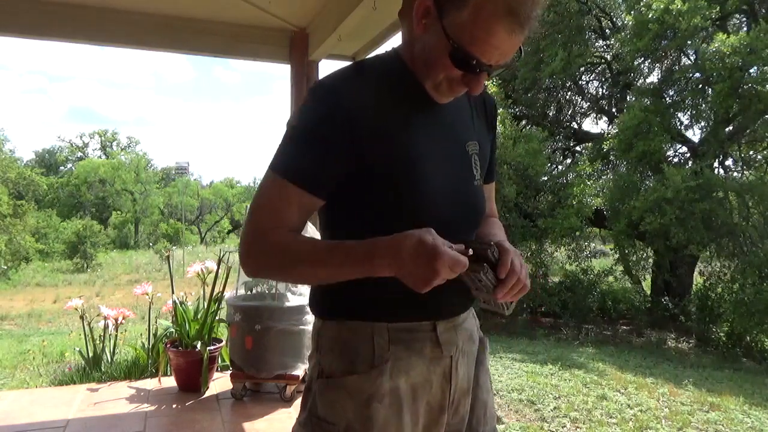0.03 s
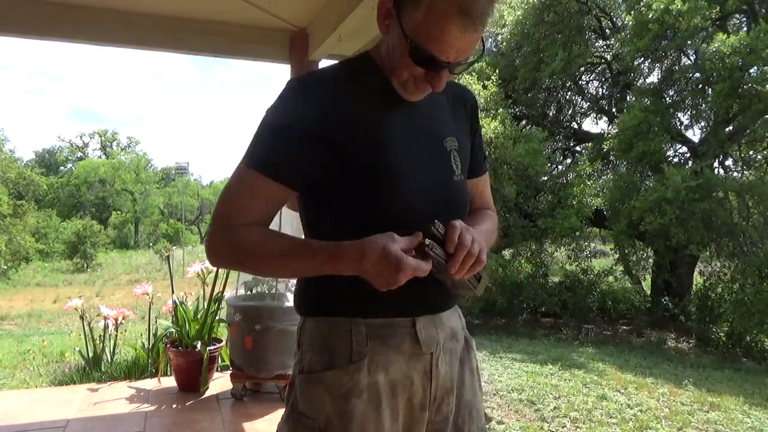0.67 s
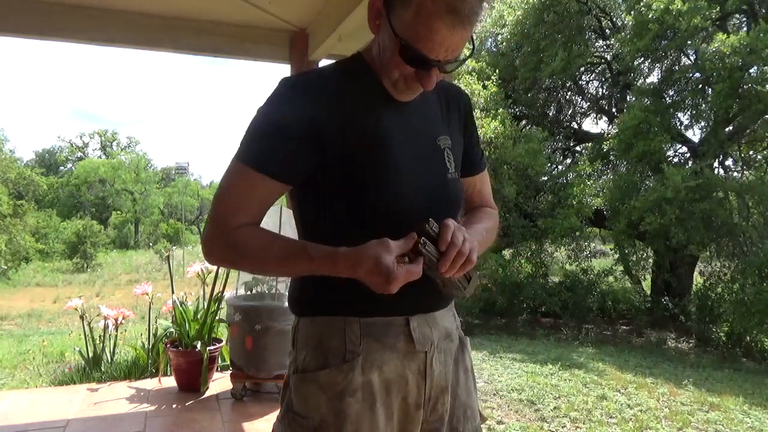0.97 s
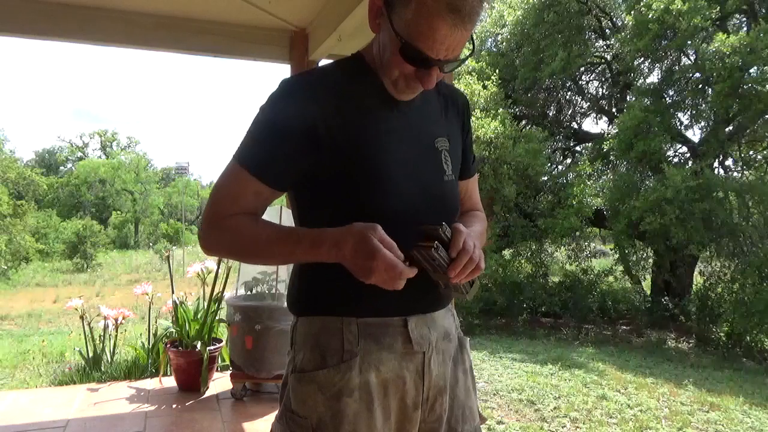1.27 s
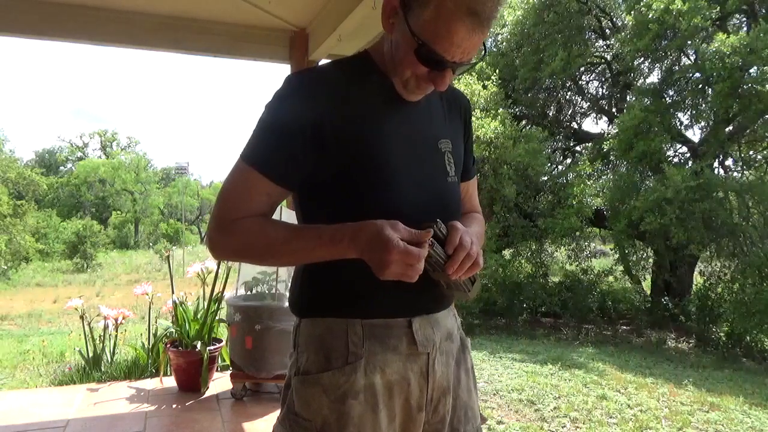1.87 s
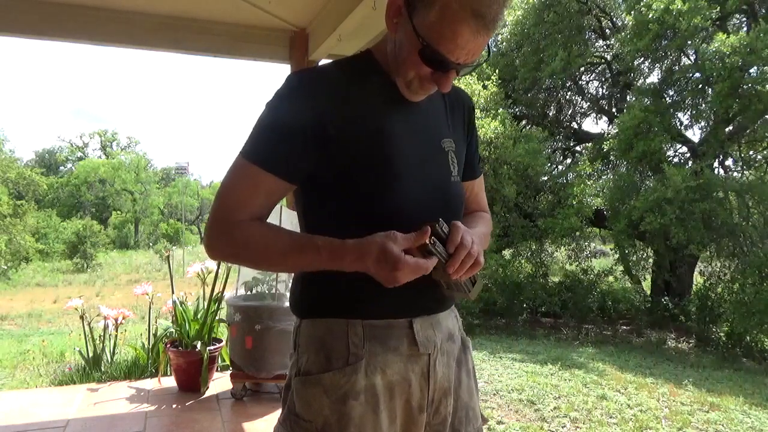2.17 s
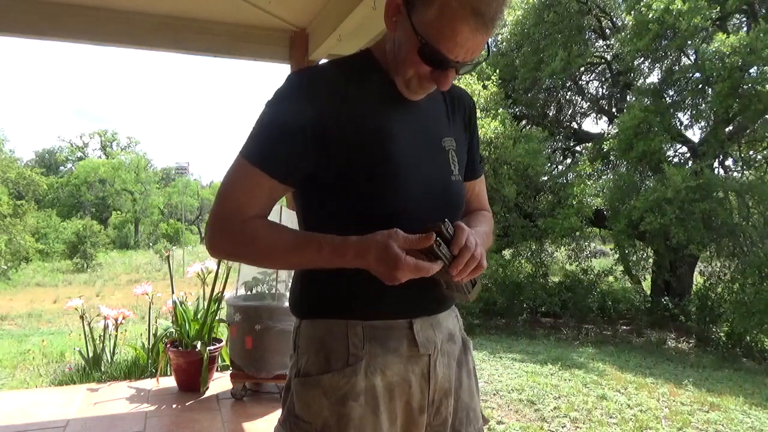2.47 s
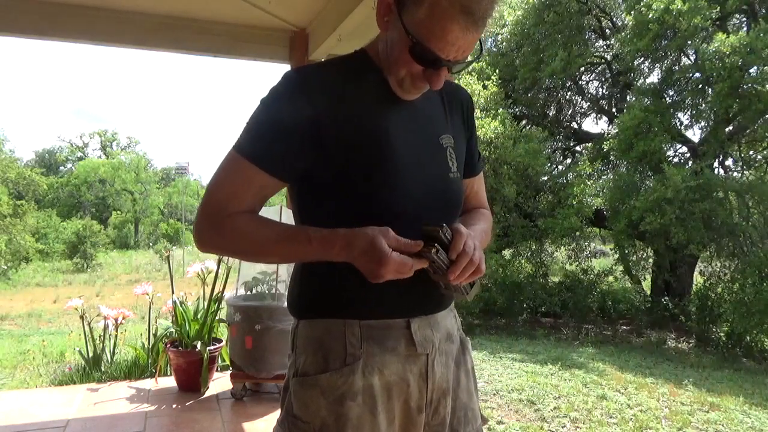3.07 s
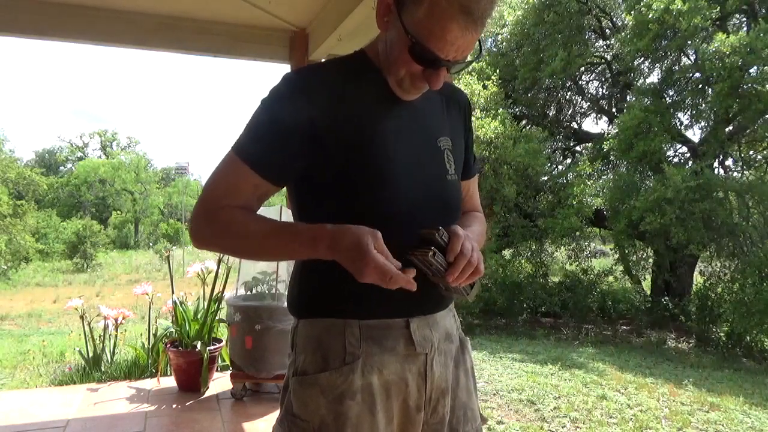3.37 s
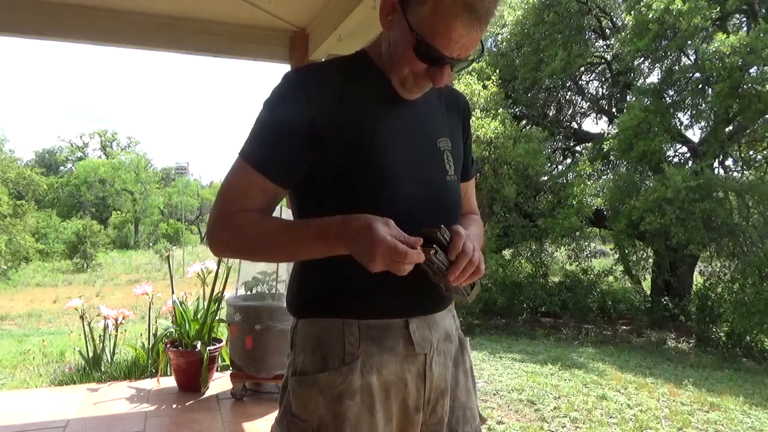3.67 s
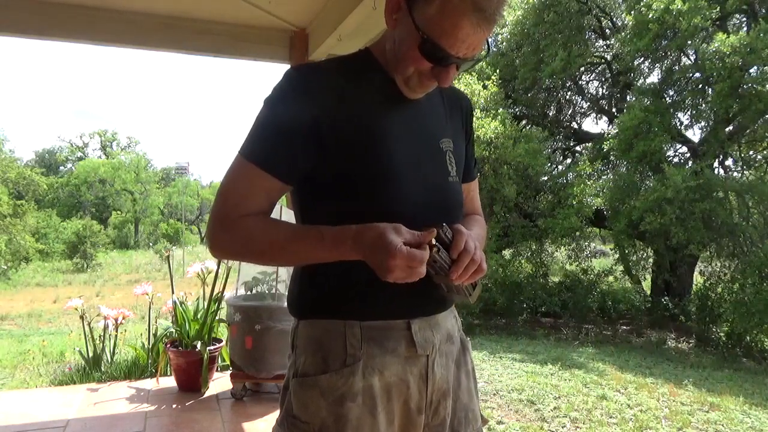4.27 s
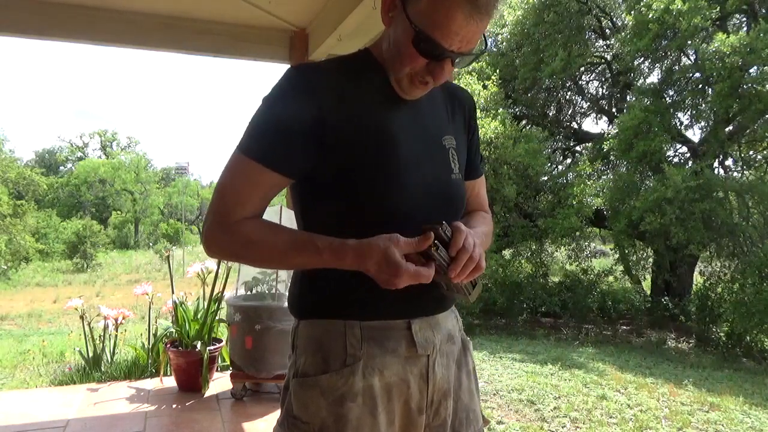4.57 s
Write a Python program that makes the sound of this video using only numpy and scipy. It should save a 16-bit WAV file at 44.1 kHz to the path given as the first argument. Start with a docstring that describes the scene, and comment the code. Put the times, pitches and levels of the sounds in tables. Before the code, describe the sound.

Close to a stereo microphone on a porch, cartridges are pressed one by one into a rifle magazine. Brass ticks and scrapes in uneven clusters, and three times a round snaps home with a brief spring rattle. Loose cases tink in the hand between the clicks. The porch adds short echoes, and distant birds give faint nasal calls over a low rumble and soft hiss.

```python
"""Loading a rifle magazine on a porch

Close to a stereo microphone, just left of centre, cartridges are thumbed one by one into a magazine.
Brass ticks against brass, slides along the feed lips, clicks and snaps home while the spring chatters.
The porch floor and roof throw back short echoes. Far off, birds call from the trees over a faint rumble."""
import sys
import numpy as np
from scipy import signal
from scipy.io import wavfile
from scipy.ndimage import uniform_filter1d, minimum_filter1d

SR = 44100
rng = np.random.default_rng(int(sys.argv[2]) if len(sys.argv) > 2 else 0)


def unload_audio(sound):
    """Save the sound as a 16-bit wav file, at the path given as the first command line argument."""
    columns = np.transpose(np.atleast_2d(sound))
    # keep every value between -1 and 1, then stretch to whole-number steps
    steps = np.round(np.clip(columns, -1, 1) * 32767)
    wavfile.write(sys.argv[1], SR, steps.astype(np.int16))


N = 212738

# Levels in the tables are relative: the functions add their own gains.
# brass strikes the magazine: start_s, level_db, treble_tilt_db, ring_hz
CLICKS = [(0.1877, -27.5, 3.5, 2390), (.2309, -29, -1.5, 2390), (0.4948, -28, 1.5, 4560),
          (.759, -22.5, 1.5, 2270), (0.9066, -33.5, 0, 2760), (0.9928, -42.5, 4, 2480),
          (1.759, -38, 3.5, 4400), (1.882, -34.5, 1.5, 7350), (1.946, -37, 2.5, 4970),
          (1.9538, -24, 2, 2330), (2.2541, -35, -3.5, 2420), (3.108, -29.5, -1.5, 3500),
          (4.2099, -28.5, 4, 6500), (4.3359, -37, -0.5, 2600), (4.3537, -25.5, -4, 4430),
          (4.5582, -28.5, -5.5, 4660), (4.634, -35.5, 7, 3000), (4.655, -34.5, 2, 4100)]
# a round snaps under the lips: start_s, level_db, treble_tilt_db, ring_hz, chatter_decay_s, slip_db
SNAPS = [(.916, -31.5, 1, 10300, 0.027, -30), (2.2893, -25, -2, 4100, .04, -36),
         (4.5708, -26.5, 1.5, 9400, 0.049, -32)]
# the thumb nudges a round against the stack, with a dull tap: start_s, level_db
NUDGES = [(0.732, -51), (0.8922, -38.5), (.9866, -39.5), (1.9197, -39.5), (2.178, -43.5), (2.599, -42.5),
          (2.753, -44.5), (2.919, -45), (2.961, -36), (2.967, -42), (4.075, -48.5)]
# brass slides on the lips: start_s, length_s, level_db
SLIDES = [(0.172, 0.013, -59), (0.752, 0.0053, -40), (0.858, 0.018, -39.5), (1.84, 0.035, -55.5),
          (2.272, 0.026, -40), (2.927, 0.052, -49), (4.051, 0.038, -55), (4.35, .011, -30),
          (4.526, 0.034, -48.5)]
# loose cases touch in the hand: start_s, level_db, pitch_hz
TINKS = [(0.1646, -42, 5300), (1.370, -23.5, 7460), (1.6704, -25.5, 7470), (4.739, -29.5, 4900)]
# how hard the fingers work over the rounds: time_s, level_db
HANDLING = [(0.0, -70), (0.89, -55), (1.14, -60), (1.64, -60), (1.87, -55.5), (2.09, -62.5), (2.42, -55.5),
            (3.11, -64.5), (3.22, -70), (3.87, -67.5), (4.82, -53)]
# fingernails tick on brass: start_s, level_db
NAIL_TICKS = [(0.351, -46.5), (0.426, -51), (0.657, -52.5), (1.356, -48), (1.592, -50.5), (1.733, -49.5),
              (1.805, -46.5), (2.088, -48.5), (4.056, -52.5)]
# the four bands of every contact sound: low_hz, high_hz
BANDS = [(640, 1700), (1700, 3800), (3800, 7000), (7000, 11500)]
# tone of a hard contact: level_db per band
HARD_COLOUR = [-0.096, -0.46, 3.4, -1.95]
# tone of a nudge: level_db per band
NUDGE_COLOUR = [0, -13.5, -3, -12.5]
# tone of a light touch on brass: level_db per band
TICK_COLOUR = [-27, -10.5, -3, -2]
# tone of skin on brass: level_db per band
SKIN_COLOUR = [0.0, 1.5, 2.0, 3.0]
# modes of the magazine body: pitch_hz, width_hz, gain_db
BODY_MODES = [(621.6, 39, -5), (704, 65, -10), (980, 36, -16.5), (1123, 61, -1), (1151, 94, 2.5),
              (1385, 214, -7), (1544, 35, -1), (2315, 82, -7), (2458, 70, 0.5), (2494, 110, -3),
              (3095, 180, -1.5), (4050, 99, -13), (4480, 140, -4.5), (7620, 230, -3), (9040, 510, -2)]
# nasal bird calls from the trees: start_s, length_s, top_pitch_hz, level_db
CALLS = [(0.394, 0.096, 512, -53), (1.419, .12, 622, -54), (1.815, .13, 561, -51.5),
         (2.989, 0.062, 527, -54), (3.053, .14, 556.5, -51), (3.938, 0.091, 499, -52.5),
         (4.09, .11, 535, -51)]
# falling bird whistles: start_s, length_s, level_db
WHISTLES = [(4.498, 0.047, -46), (4.686, 0.15, -52)]
# first reflections off floor and roof: delay_s, gain_db, cutoff_hz
REFLECTIONS = [(.0056, -15.5, 7300), (0.0143, -23, 3500)]
# reverberation of the porch: frequency_hz, tail_t60_s, early_db, tail_db
PORCH_REVERB = [(400, 0.89, -3, -5.5), (1110, 0.39, -6, -12), (2550, 0.34, -7, -11), (4770, 0.41, -12, -18),
                (10080, 0.31, -12, -20)]
# how alike diffuse sound is in the left and right channels: frequency_hz, correlation
STEREO_LIKENESS = [(40, 0.97), (120, 0.93), (300, 0.69), (1000, 0.81), (4000, 0.5), (10000, 0.57)]
# spectral shape of the outdoor air: frequency_hz, density_db
AIR_SPECTRUM = [(15, -37), (25, -6), (75, -2), (272, -14), (309, -14), (342, -11), (557, -18.5), (862, -11),
                (980, -23), (1090, -17.5), (2950, -22.5), (4120, -23), (10100, -33.5), (11500, -45),
                (15000, -75), (22000, -120)]
# rise and fall of the low rumble: time_s, level_db
RUMBLE = [(0.0, -65.5), (0.63, -60.5), (0.94, -55.5), (1.31, -59.5), (2.11, -56), (3.1, -63), (4.05, -56),
          (4.36, -62.5), (4.82, -52.5)]
# soft low bumps in the rumble: start_s, peak_db, pitch_hz
BUMPS = [(.66, -45, 170), (0.827, -40.5, 97), (1.654, -45, 100), (2.164, -47, 80), (4.1, -41, 75),
         (4.475, -43.5, 75.8), (4.62, -35, 92)]


def magazine(click_db=-4.0, nudge_db=-4.0, slide_db=-0.5, chatter_db=-2, body_db=2.5, slip_lead_s=0.0024):
    """Close up: clicks, nudges, snaps and slides all set the magazine body ringing."""
    out, t = np.zeros(N), seconds(.3)
    for s, db, tilt_db, ring_hz in CLICKS:
        add(out, s, knock(hard_contact_levels(db + click_db, tilt_db, ring_hz), ring_hz))
    for s, db in NUDGES:
        levels_db = db + nudge_db + np.array(NUDGE_COLOUR)
        add(out, s, knock(levels_db, ring_hz=2440, decay_s=0.0017, rise_s=0.00066))
    for s, db, tilt_db, ring_hz, chatter_decay_s, slip_db in SNAPS:
        # the rim slips off the lip with a bright crack just before the snap
        add(out, s - slip_lead_s, knock(tilted(slip_db, tilt_db=11), ring_hz=9750))
        levels_db = hard_contact_levels(db, tilt_db, ring_hz)
        add(out, s, knock(levels_db, ring_hz, decay_s=0.0029))
        # the spring and the stack of rounds rattle on
        add(out, s, rub(np.exp(-t / chatter_decay_s), levels_db + chatter_db, per_s=7000, spread_db=1.5))
    for s, length, db in SLIDES:
        pressure = np.sin(np.pi * (seconds(length) / length) ** 1.3) ** .5
        add(out, s, rub(pressure, tilted(db + slide_db, tilt_db=1), per_s=6000, spread_db=3.0))
    body = sum(from_db(db) * resonance(out, hz, width) for hz, width, db in BODY_MODES)
    bass_cut = signal.butter(4, 553, "high", fs=SR, output="sos")   # so small a box radiates no bass
    return signal.sosfilt(bass_cut, out + from_db(body_db) * body)


def knock(levels_db, ring_hz, decay_s=0.002, rise_s=0.00014, ring_db=-2.5, ring_width_hz=260):
    """Crowded metal modes, damped at once by the hand; the low ones are slower, and one stands out."""
    t, attack = seconds(.04), int(.006 * SR)
    modes = 0
    for (low, high), db in zip(BANDS, levels_db):
        slowness = (BANDS[-1][1] / high) ** 0.2
        envelope = (1 - np.exp(-t / (rise_s * slowness))) * np.exp(-t / (decay_s * slowness))
        burst = band(rng.choice([-1, 1], len(t)) * envelope, low, high)
        modes = modes + from_db(db) * burst / np.std(burst[:attack])
    ring_level = from_db(np.interp(ring_hz, np.mean(BANDS, axis=1), levels_db) + ring_db)
    ring_envelope = (1 - np.exp(-t / rise_s)) * np.exp(-np.pi * ring_width_hz * t)
    ring = np.sin(2 * np.pi * ring_hz * t) * ring_envelope
    return modes + ring_level * ring / np.std(ring[:attack])


def hard_contact_levels(db, tilt_db, ring_hz, lift_db=2.5, spread_octaves=0.82):
    """Band levels of a hard contact, which drives the modes around its ring harder too."""
    octaves = np.log2(np.sqrt(np.prod(BANDS, axis=1)) / ring_hz)
    return tilted(db, tilt_db) + HARD_COLOUR + lift_db * np.exp(-(octaves / spread_octaves) ** 2)


def rub(pressure, levels_db, per_s, spread_db):
    """Tiny contacts at random moments, a few harder than the rest, swelling with the pressure."""
    size = len(pressure)
    strengths = from_db(spread_db * np.minimum(rng.exponential(1, size), 4))
    contacts = strengths * rng.choice([-1, 1], size) * (rng.random(size) < per_s / SR)
    friction = sum(from_db(db) * rms_one(band(contacts, *edges)) for edges, db in zip(BANDS, levels_db))
    return pressure * friction


def stack_thuds(gain_db=-17, band_hz=(364, 710), decay_s=0.027):
    """Each snap shoves the whole stack down against the spring with a low thud."""
    out, t = np.zeros(N), seconds(.2)
    for s, db, *_ in SNAPS:
        shudder = rms_one(band(rng.standard_normal(len(t)), *band_hz))
        add(out, s, from_db(db + gain_db) * shudder * np.exp(-t / decay_s))
    return out


def loose_cases(t60_s=0.024, beat_hz=350, twin_db=-5.0, tick_db=-22.0):
    """A case rings with a close pair of modes that beat, soon stopped by the fingers."""
    out, t = np.zeros(N), seconds(.1)
    for s, db, hz in TINKS:
        pair = np.sin(2 * np.pi * hz * t) + from_db(twin_db) * np.sin(2 * np.pi * (hz + beat_hz) * t)
        add(out, s, from_db(db - 60 * t / t60_s) * pair)
        add(out, s, knock(db + tick_db + np.array(TICK_COLOUR), hz))
    return out


def fingers(uneven_db=3.5):
    """Skin rubs softly over brass, and now and then a nail ticks."""
    pressure = from_db(uneven_db * drift(points=130))
    out = from_db(level_curve(HANDLING)) * rms_one(rub(pressure, SKIN_COLOUR, per_s=600, spread_db=2.0))
    for s, db in NAIL_TICKS:
        add(out, s, knock(db + np.array(TICK_COLOUR), ring_hz=rng.uniform(5170, 9200)))
    return out


def bird_calls(arch=0.21, rasp=0.013, throat_start_hz=5060, throat_end_hz=3250, throat_width_hz=1440):
    """Nasal calls from the trees: arching harmonics through a resonance that falls as the throat closes."""
    out, harmonics = np.zeros(N), np.arange(3, 15)[:, None]
    for s, length, top_hz, db in CALLS:
        progress = seconds(length) / length
        bend = (1 - arch * abs(2 * progress - 1) ** 1.8) * (1 + rasp * waver(len(progress), smooth=90))
        throat_hz = throat_start_hz + (throat_end_hz - throat_start_hz) * progress
        throat_hz *= np.sqrt(bend)   # the resonance rises a little with the pitch
        weights = 1 / (1 + ((harmonics * top_hz * bend - throat_hz) / throat_width_hz) ** 2) ** 2
        cycles = harmonics * top_hz * np.cumsum(bend) / SR + rng.random(harmonics.shape)
        call = np.sum(weights * np.sin(2 * np.pi * cycles), axis=0)
        swell = np.sqrt(np.sin(np.pi * progress)) * from_db(waver(len(progress), smooth=500))
        add(out, s, from_db(db) * rms_one(call * swell))
    return out


def bird_whistles(start_hz=4390, fall_hz_per_s=3200, wobble=0.068):
    """Distant whistles: each a pure tone that wavers as it falls."""
    out = np.zeros(N)
    for s, length, db in WHISTLES:
        t = seconds(length)
        pitch_hz = (start_hz - fall_hz_per_s * t) * (1 + wobble * waver(len(t), smooth=50))
        tone = np.sin(2 * np.pi * np.cumsum(pitch_hz) / SR)
        add(out, s, from_db(db) * rms_one(tone * np.sin(np.pi * t / length)))
    return out


def first_reflections(x):
    """Floor and roof each send one dulled echo to the microphone."""
    out = np.zeros(N)
    for delay_s, db, cutoff_hz in REFLECTIONS:
        dulling = signal.butter(2, cutoff_hz, fs=SR, output="sos")
        add(out, delay_s, from_db(db) * signal.sosfilt(dulling, x))
    return out


def porch(x, early_t60_s=0.11, first_echo_s=.003):
    """Quick echoes off body, floor and roof, then a short thin tail; both lose treble."""
    t = seconds(.4)
    response = 0
    for hz, noise in diffuse_bands(len(t)):
        tail_t60_s, early_db, tail_db = (at_hz(PORCH_REVERB, hz, column) for column in (1, 2, 3))
        early = rms_one(from_db(-60 * t / early_t60_s) * (t > first_echo_s))
        tail = rms_one(from_db(-60 * t / tail_t60_s) * (t > first_echo_s))
        response = response + noise * np.hypot(from_db(early_db) * early, from_db(tail_db) * tail)
    return signal.oaconvolve(x[None], response / np.sqrt(len(t)), axes=1)[:, :N]


def moving_echoes(x, positions=9):
    """The hands keep moving, so the pattern of echoes glides from one position to the next."""
    place = np.linspace(0, positions - 1, N)
    return sum(porch(x * np.sqrt(np.maximum(1 - abs(place - k), 0))) for k in range(positions))


def outdoor_air(split_hz=240, gust_db=4.0, rumble_gain_db=3, hiss_db=-56.5):
    """Beyond the porch: a lumpy low rumble and the even hiss of distant trees."""
    rumble, hiss = 0, 0
    for hz, noise in diffuse_bands(N):
        noise = noise * from_db(at_hz(AIR_SPECTRUM, hz))
        if hz < split_hz:
            rumble = rumble + noise * from_db(gust_db * drift(points=90))
        else:
            hiss = hiss + noise
    rumble_level = from_db(rumble_gain_db + level_curve(RUMBLE))
    return rumble_level * rms_one(rumble) + from_db(hiss_db) * rms_one(hiss)


def low_bumps(cycles=2.6):
    """Each bump in the rumble swells and dies within a few cycles."""
    out = np.zeros(N)
    for s, db, hz in BUMPS:
        t = seconds(cycles / hz)
        add(out, s, from_db(db) * np.hanning(len(t)) * np.sin(2 * np.pi * (hz * t + rng.random())))
    return out


def diffuse_bands(size):
    """Sound from all around the microphone: half-octave bands, as (centre_hz, stereo noise)."""
    edges = 22 * 2 ** (np.arange(20) / 2)
    white = rng.standard_normal((2, 2, size))
    for k, (low, high) in enumerate(zip(edges, edges[1:])):
        mid, side = band(white[k % 2], low, high, order=2)
        hz = np.sqrt(low * high)
        alike = at_hz(STEREO_LIKENESS, hz)
        yield hz, np.sqrt(1 + alike) * mid + np.sqrt(1 - alike) * side * np.array([[1], [-1]])


def tilted(db, tilt_db):
    """A level for each band, leaning towards the treble by the tilt."""
    return db + tilt_db * np.linspace(-1, 1, len(BANDS))


def drift(points):
    """A slow random curve across the whole scene."""
    return np.interp(np.arange(N), np.linspace(0, N, points), rng.standard_normal(points))


def waver(size, smooth):
    """Random wobble, averaged over `smooth` samples."""
    return rms_one(uniform_filter1d(rng.standard_normal(size), smooth))


def resonance(x, hz, width_hz):
    """Two-pole resonance with gain 1 at its peak."""
    r = np.exp(-np.pi * width_hz / SR)
    feedback = [1, -2 * r * np.cos(2 * np.pi * hz / SR), r * r]
    return signal.lfilter(np.array([1, 0, -1]) * (1 - r * r) / 2, feedback, x + 1e-18)


def band(x, low, high, order=3):
    return signal.sosfilt(signal.butter(order, [low, high], "band", fs=SR, output="sos"), x)


def add(track, s, sound):
    """Mix a sound into the track from time s on."""
    i = int(s * SR)
    track[i:i + len(sound)] += sound[:max(N - i, 0)]


def level_curve(rows):
    return np.interp(np.arange(N) / SR, *np.transpose(rows))


def at_hz(rows, hz, column=1):
    columns = np.transpose(rows)
    return np.interp(np.log(hz), np.log(columns[0]), columns[column])


def from_db(db):
    return 10 ** (np.asarray(db) / 20)


def rms_one(x):
    return x / np.sqrt(np.mean(x ** 2) + 1e-20)


def seconds(length):
    return np.arange(int(length * SR)) / SR


def scene(pan_db=0.46, near_wet_db=1.0, palm_db=-2.5, far_direct_db=-0.5, far_wet_db=3.5):
    """The hands are close to the microphone, just left of centre; the birds are far and more diffuse."""
    hands = magazine() + stack_thuds() + fingers()
    cases = loose_cases()
    birds = bird_calls() + bird_whistles()
    spill = hands + from_db(palm_db) * cases   # the palm shields the loose cases from the porch
    echoes = first_reflections(spill) + from_db(near_wet_db) * moving_echoes(spill)
    near = (hands + cases + echoes) * from_db([[pan_db], [-pan_db]])
    far = from_db(far_direct_db) * birds + from_db(far_wet_db) * porch(birds)
    return near + far + outdoor_air() + low_bumps()


def record(dry, ceiling_db=-7.0, release_db_per_s=502.5, cutoff_hz=11000):
    """At the recorder, a fast limiter holds down the hardest snaps, and the top octave is cut."""
    over_db = np.maximum(20 * np.log10(abs(dry).max(axis=0) + 1e-9) - ceiling_db, 0)
    release_db = release_db_per_s * np.arange(N) / SR
    gain_db = release_db - np.maximum.accumulate(over_db + release_db)
    gain_db = uniform_filter1d(minimum_filter1d(gain_db, size=32), size=32)   # eases in before each peak
    lowpass = signal.ellip(10, .3, 70, cutoff_hz, fs=SR, output="sos")
    return signal.sosfilt(lowpass, dry * from_db(gain_db))


dry = scene()
out = record(dry)
unload_audio(out)
```